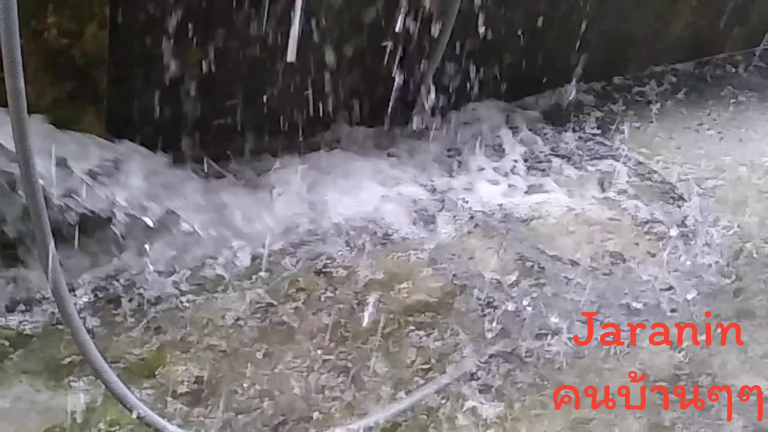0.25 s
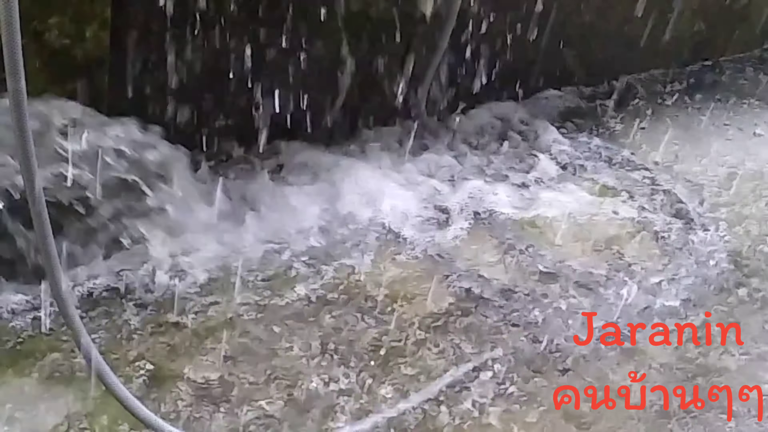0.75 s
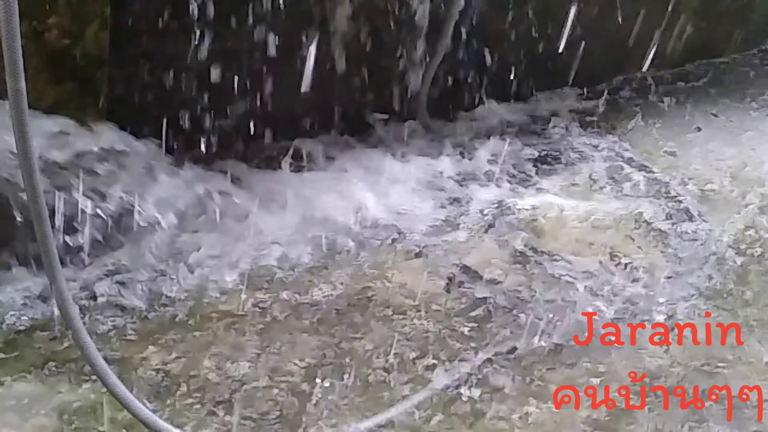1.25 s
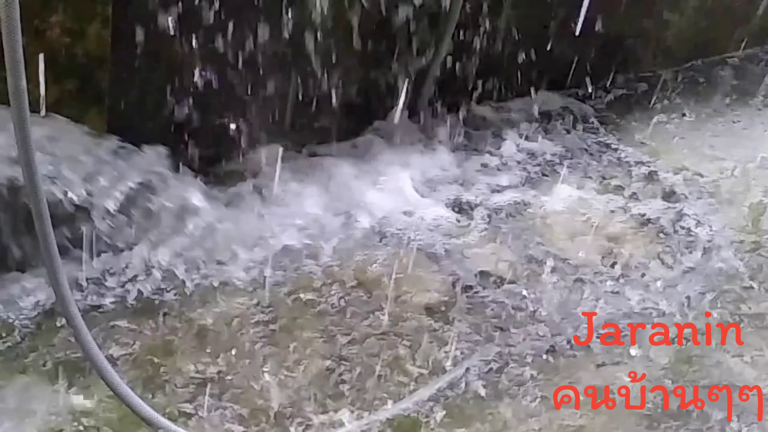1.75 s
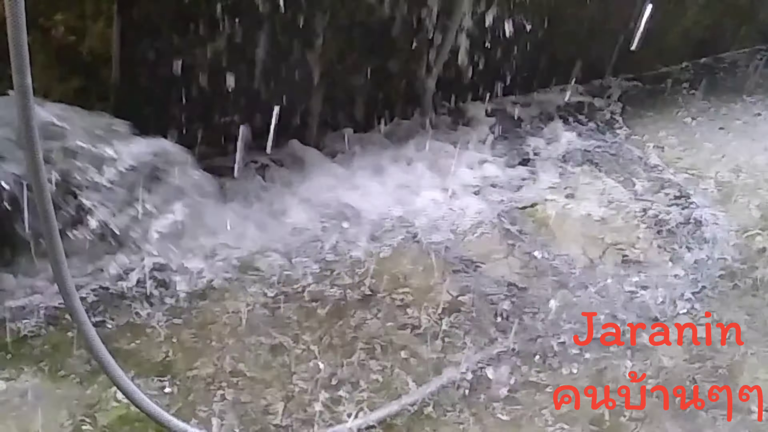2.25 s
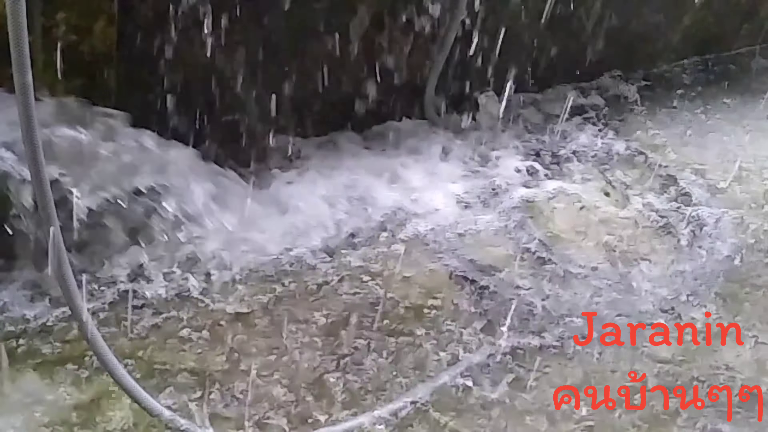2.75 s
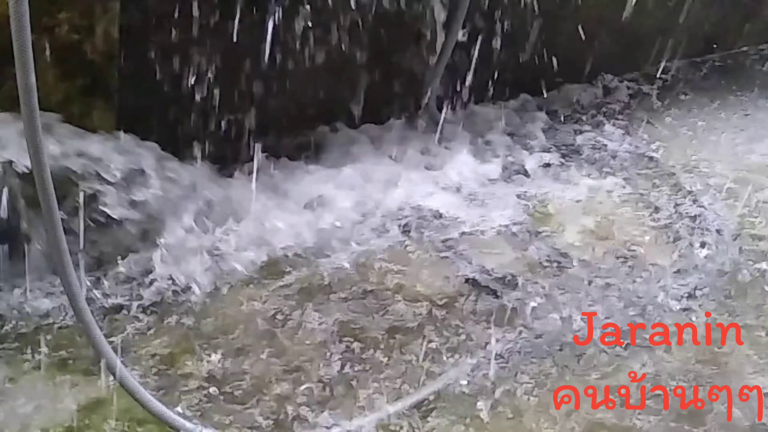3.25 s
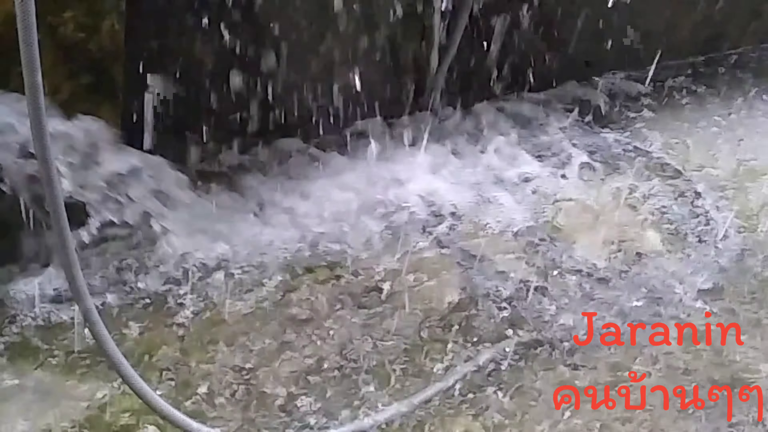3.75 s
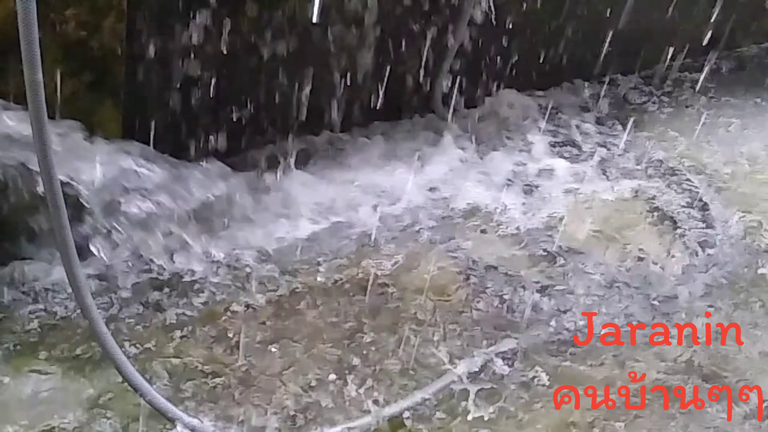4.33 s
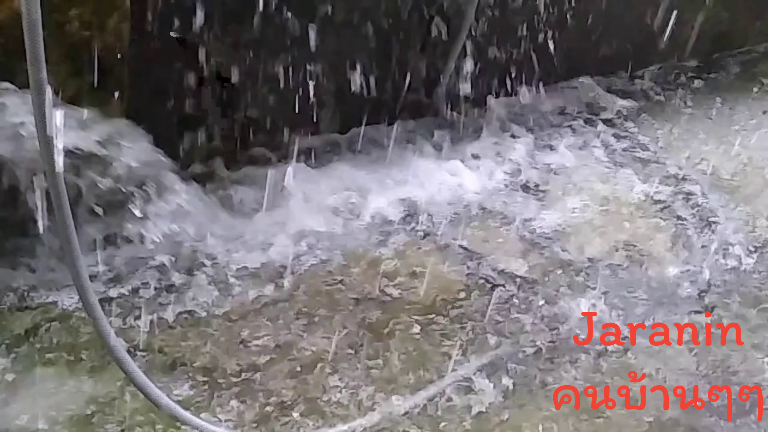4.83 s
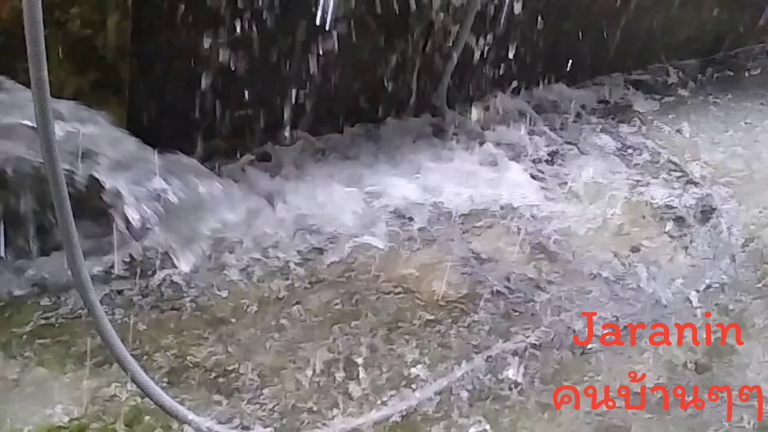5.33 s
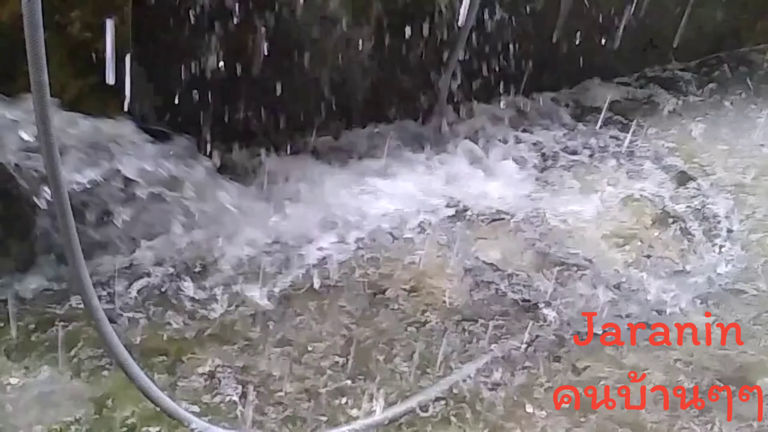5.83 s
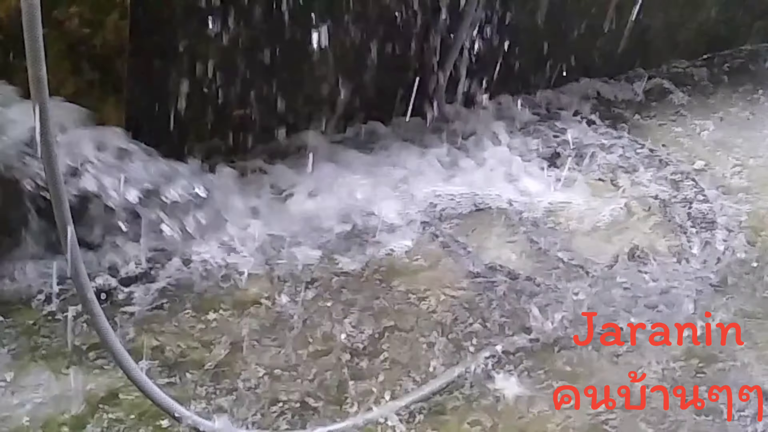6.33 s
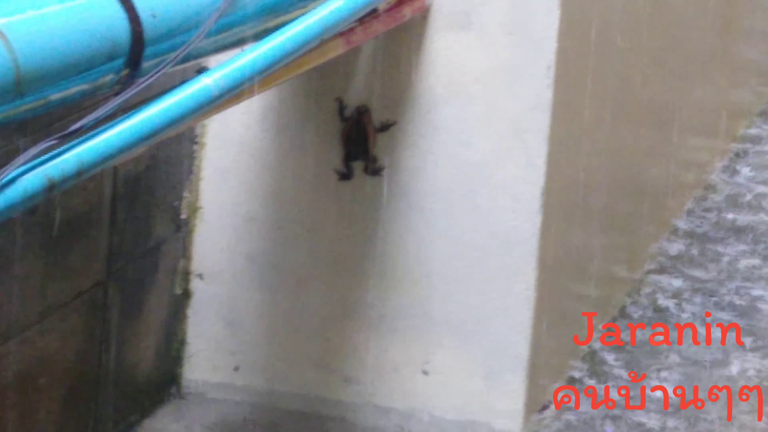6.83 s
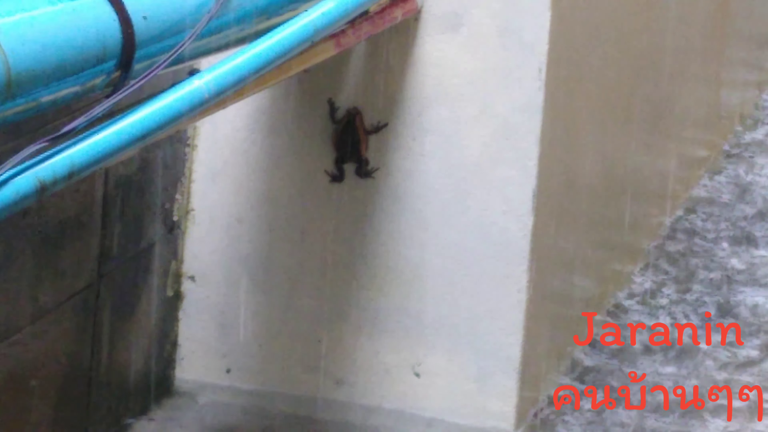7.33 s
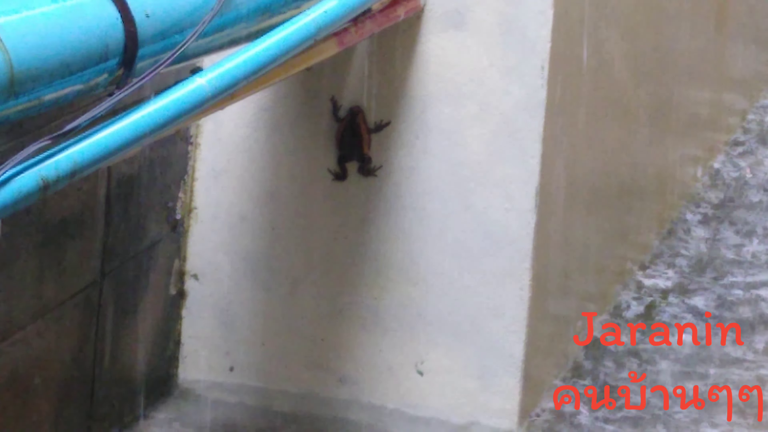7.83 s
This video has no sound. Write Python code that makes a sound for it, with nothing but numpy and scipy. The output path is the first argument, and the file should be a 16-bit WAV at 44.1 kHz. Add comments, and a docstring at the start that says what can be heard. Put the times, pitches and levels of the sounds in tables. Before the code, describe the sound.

A loud, dense downpour fills a concrete yard, with a drain gushing steadily underneath and sharp wet drops striking close by. The sound is dull on top, as if through a narrow microphone channel. After about six and a half seconds it cuts to a very short silence, then quieter, brighter rain quickly fades in beside a sheltered wall, fizzing more on the left.

```python
"""A downpour heard from two places, joined by a short silence: countless splashes merge into a hiss.
First a yard where a drain gushes over concrete, through a narrow channel that ends near 5 kHz; then,
fading in, a sheltered wall at wider bandwidth. Far rain is patchy filtered noise, near drops are ragged
decaying bursts, the drain and runoff are the bass of the water, and each microphone port has its own colour."""
import sys
import numpy as np
from scipy import signal
from scipy.fft import rfft, irfft, next_fast_len
from scipy.io import wavfile
from scipy.ndimage import uniform_filter1d, map_coordinates

SR = 44100
rng = np.random.default_rng(int(sys.argv[2]) if len(sys.argv) > 2 else 0)


def store_wav(level_fs):
    """Save 16-bit WAV to argv[1]."""
    pcm = np.round(np.clip(np.atleast_2d(level_fs), -1, 1) * 32767)
    wavfile.write(sys.argv[1], SR, pcm.T.astype(np.int16))


N = 356328
YARD_END, WALL_START = 6.4405, 6.562  # s

# The loudest near drops in both places. Each row: moment in seconds, left level in dB,
# right level in dB, pitch in Hz; levels are those before the drops are dulled.
DROPS = [(0.6388, 2, 3, 3780), (1.1824, -10, -1, 3285), (1.6257, -7, -3.5, 3350), (1.8636, -14, -2, 3440),
         (2.0316, -2.5, -8.5, 3300), (2.1945, -4.5, -9, 3690), (2.3055, -7.5, -3, 3400),
         (2.506, -0.5, -4, 3470), (3.083, -7, -1, 3310), (4.196, -6.5, -9, 3310),
         (4.4304, -5.5, -2.5, 3120), (4.6288, -9, -1, 3610), (4.669, -4, 2, 3330), (4.6769, -9, 0.1, 3020),
         (5.0752, -8, 0.1, 3530), (5.38, -9.5, -4, 2900), (5.8908, -6, -0.5, 2910), (6.7912, -19, -7, 3320),
         (6.8214, -17, -5, 3400), (7.156, -16, -12, 2700), (7.2696, -15, -4, 3500), (7.493, -21, -8, 3001)]


def amp(db):
    """The decibel: 20 dB is a factor of ten in amplitude."""
    return 10 ** (np.asarray(db) / 20)


def unit(x):
    """Normalisation to a root-mean-square of one."""
    return x / np.sqrt(np.mean(x ** 2) + 1e-20)


def along(points, hz):
    """Interpolation on a logarithmic frequency axis of the columns of (Hz, value, ..) points."""
    f, *columns = np.transpose(points)
    return np.array([np.interp(np.log(hz + 1), np.log(f + 1), column) for column in columns])


def wobble(rate):
    """Slow random modulation: a smooth curve through random knots, rate knots a second."""
    knots = rng.standard_normal(int(N * rate / SR) + 4)
    return map_coordinates(knots, [np.arange(N) * rate / SR])


def filtered(x, response):
    """Linear filtering: the spectrum of x times a response of frequency."""
    m = next_fast_len(N + 8192)
    return irfft(rfft(x, m) * response(np.fft.rfftfreq(m, 1 / SR)), m)[..., :N]


def below(x, hz):
    """Zero-phase low-pass filtering: the part of x under hz."""
    return filtered(x, lambda f: 1 / (1 + (f / hz) ** 4))


def hiss(alike, patchy_db, fizz_db):
    """Far rain as stereo noise with local gain fluctuations and a correlation that depends on frequency."""
    white = signal.stft(rng.standard_normal((2, N)), nperseg=512)[2]
    shape = white.shape[1:]  # frequency bins, time frames
    patches = uniform_filter1d(rng.standard_normal(shape), size=8, axis=0)
    patches = uniform_filter1d(patches, size=10, axis=1)
    fizz = uniform_filter1d(rng.standard_normal(shape), size=7, axis=1)  # brief, one bin wide
    gain_db = patchy_db * unit(patches) + fizz_db * unit(fizz)
    pair = signal.istft(white * amp(gain_db), nperseg=512)[1][:, :N]

    def mid_side_gains(hz):
        # the cosine of twice this angle is the left-right correlation
        angle = np.arccos(np.clip(along(alike, hz)[0], -1, 1)) / 2
        return np.array([np.cos(angle), np.sin(angle)])

    mid, side = filtered(pair, mid_side_gains)
    return unit(np.array([mid + side, mid - side]))


def splats(s, gains, hz, cycles, size=200):
    """Transient oscillation: each drop is a ragged burst, its envelope peaking at s, in random phase per port."""
    t = np.arange(size) / SR
    rise = cycles / hz
    u = t / rise[:, None]
    envelope = (np.e * u * np.exp(-u))[:, None]
    phase = rng.uniform(0, 2 * np.pi, (len(s), 2, 1))
    ragged = 1 + .5 * rng.standard_normal((len(s), 2, size))
    wave = envelope * np.sin(2 * np.pi * hz[:, None, None] * t + phase) * ragged
    first = (np.clip(s - rise, 0, None) * SR).astype(int)
    at = first[:, None] + np.arange(size)
    ports = []
    for c in (0, 1):
        weighted = wave[:, c] * gains[:, c, None]
        ports.append(np.bincount(at.ravel(), weighted.ravel(), N + size)[:N])
    return np.array(ports)


def patter(span, low_hz, high_hz, spread_db, cycles, count):
    """Near rain as a random superposition of splashes, a few much larger than most; rms 1 while it lasts."""
    draw = rng.uniform(size=(count, 3))
    s = span[0] + (span[1] - span[0]) * draw[:, 0]
    hz = low_hz + (high_hz - low_hz) * draw[:, 1]
    size_db = np.minimum(-spread_db * np.log(draw[:, [2]]), 11)
    size_db = size_db + 1.9 * rng.standard_normal((count, 2))  # differs between the ports
    splashes = splats(s, amp(size_db), hz, cycles)
    bright = splashes - below(splashes, low_hz)
    return unit(bright) * np.sqrt((span[1] - span[0]) * SR / N)


def stray_drops(count):
    """Random arrivals: rows like those of DROPS, at chance moments in the yard with scattered level and pitch."""
    s, draw = rng.uniform(0, YARD_END, count), rng.standard_normal((count, 3))
    levels_db = np.add((-11, -4.5), 2.5 * draw[:, :2])  # mean left and right
    hz = 3500 + 350 * draw[:, 2]
    return list(np.column_stack([s, levels_db, hz]))


def big_drops(table, cycles, top_hz):
    """Impact and fallback: large drops with a level at each port, their edge dulled by wet ground."""
    s, left_db, right_db, hz = np.transpose(table)
    gains = amp(np.transpose([left_db, right_db]))
    drops = splats(s, gains, hz, cycles)
    for late_s, late_db in [(.0016, -1.5), (.0038, -5.5)]:  # the splash falls back as smaller droplets
        late = s + late_s * rng.uniform(.7, 1.3, len(s))
        drops += splats(late, gains * amp(late_db), hz * rng.uniform(.8, 1.25, len(s)), cycles)
    return below(drops, top_hz)


def ticks():
    """Filtered impulses: faint crackles at listed moments, reaching above the yard's band, duller when softer."""
    # Faint treble ticks. Each row: moment in seconds, level in dB before the burst is coloured.
    tick_rows = [(0.3222, -35), (0.4663, -29), (0.6245, -19), (0.6388, -6.5), (1.6257, -38), (1.9435, -39),
                 (2.3047, -37), (2.506, -11.5), (2.5775, -34), (3.3253, -31), (4.189, -35), (4.3105, -32),
                 (4.4292, -12.5), (5.0731, -27)]
    top_hz, slope, dull_db = 5960, 3.2, 7  # the fall is one order steeper for each dull_db of level lost
    out, n = np.zeros((2, N)), np.arange(1024)
    distance = np.abs(n - 300)  # samples from the peak
    # a sharp peak with a faint noise tail on both sides
    decay = amp(-.25 * distance) + amp(-19.0 - 0.028 * distance)
    hz = np.fft.rfftfreq(len(n), 1 / SR)
    for s, db in tick_rows:
        burst = rfft(decay * np.hanning(len(n)) * rng.standard_normal((2, len(n))))
        colour = np.clip(hz / 500 - 9, 0, 1) / (1 + (hz / top_hz) ** (slope - db / dull_db))
        out[:, round(s * SR) - 300:][:, :len(n)] += amp(db) * irfft(burst * colour)
    return out


def snap():
    """Exponential decay of a noise burst: one drop right at the left port, softened above 9 kHz."""
    # One row: start in seconds, left level in dB, right level in dB, both before softening.
    snap_row = (6.692, -2, -21)
    at, out = round(snap_row[0] * SR), np.zeros((2, N))
    level_db = np.array(snap_row[1:])[:, None] - np.arange(60) * 1.1  # 1.1 dB down a sample
    out[:, at:at + 60] = amp(level_db) * rng.standard_normal(60)
    return below(out, 9000)


def runoff(bass):
    """Amplitude modulation: the bass of the wall's water wavers as runoff."""
    return amp(-37 + 2.1 * wobble(6)) * unit(bass)


def wall():
    """Directional colouring: the left port faces the spray and fizzes, the right is shaded and rings near 3 kHz."""
    # Port colour. Each row: frequency in Hz, left gain in dB, right gain in dB.
    wall_ports = [(30.5, -15, -10), (156, -4.5, -5), (453, -11.5, -7.5), (800, -9, -4), (1290, -7, -6.5),
                  (1750, -11.5, -7.5), (2290, -11, -1.5), (3360, -11.5, 1.5), (4450, -11.5, -10.5),
                  (5930, -12.5, -11), (7600, -15, -25), (10160, -8, -31), (11800, -2.5, -29),
                  (14500, -5, -33)]
    # Left-right likeness of far rain. Each row: frequency in Hz, correlation from -1 to 1.
    wall_alike = [(60, 0.99), (200, .98), (340, .92), (640, 0.69), (900, 0.051), (1400, 0), (4000, 0.012)]
    rain_db, spray_db = -23, -24.5  # mean levels once faded in, before the swell
    fade_s, fade_from_db = .2, -15.5  # rises evenly in dB
    swell_s, swell_lasts_s, swell_db = 7.5, 0.11, 2.5  # centre, half width at 1/e, rise of the rain
    t = np.arange(N) / SR
    fade_db = fade_from_db * np.clip(1 - (t - WALL_START) / fade_s, 0, 1)
    swell = swell_db * np.exp(-((t - swell_s) / swell_lasts_s) ** 2)

    far = hiss(wall_alike, patchy_db=0.9, fizz_db=3.0)
    near = patter((6.55, 8.07), 1300, 17000, spread_db=1.0, cycles=.9, count=6000)
    spit = patter((6.55, 8.07), 8000, 15500, spread_db=4.2, cycles=3.5, count=900)  # fine droplets ping high
    mixed = far + amp(-8.0) * near + amp(-8.5) * spit
    water = filtered(mixed, lambda hz: amp(along(wall_ports, hz)) * hz / np.hypot(hz, 25))

    bass, dull = below(water, 380), below(water, 6200)
    sound = amp(rain_db + swell + 0.19 * wobble(5.6) + 0.27 * wobble(17)) * unit(dull - bass)
    sound += amp(spray_db + 0.56 * wobble(12)) * unit(water - dull)
    sound += runoff(bass)
    drops = big_drops([d for d in DROPS if d[0] > WALL_START], cycles=1.46, top_hz=4840)
    return amp(fade_db) * sound + snap() + drops


def drain(bass):
    """Independent modulation: the gushing drain owns the yard's bass and surges on its own."""
    return amp(-26.5 + 0.25 * wobble(2.5) + 0.32 * wobble(7)) * unit(bass)


def narrow_channel(sound):
    """Saturation, then band limiting: the microphone rounds off the loudest drops and the treble ends steeply."""
    top_hz = 4927  # about 9 dB down here
    squeezed = sound / (1 + np.abs(sound / .85) ** 4) ** (1 / 4)

    def response(hz):
        loss_db = np.clip((hz - top_hz + 180) / 60, 0, 9) ** 2 * 1.01
        return amp(-loss_db) * hz / np.hypot(hz, 15)

    return filtered(squeezed, response)


def yard():
    """Superposition: far hiss, near patter, large drops and the drain add up before the narrow channel."""
    # Port colour. Each row: frequency in Hz, left gain in dB, right gain in dB.
    yard_ports = [(25, 3, -0.5), (60, 3, 4.5), (89, -2, -0.5), (280, 1.5, 2), (400, 2, 4), (710, -3, -0.5),
                  (965, -1.5, 1.5), (1310, -6, -1), (1490, -3, -2.5), (1880, -9, -7.5), (2603, -4.5, 3),
                  (3320, 0, 5), (4200, -4.5, -1), (4700, -2.5, -3)]
    # Left-right likeness of far rain. Each row: frequency in Hz, correlation from -1 to 1.
    yard_alike = [(40, 1), (130, 0.85), (260, 0.44), (340, -0.15), (430, -0.5), (560, 0.37), (900, -0.035)]
    rain_db = -14  # mean level before the channel
    near = patter((0, 6.45), 1400, 5500, spread_db=3.0, cycles=1.2, count=9000)
    mixed = hiss(yard_alike, patchy_db=0.83, fizz_db=2.0) + amp(-10.0) * near
    water = filtered(mixed, lambda hz: amp(along(yard_ports, hz)))

    bass = below(water, 450)
    waver_db = 0.5 * wobble(1.9) + 0.46 * wobble(9) + 0.39 * wobble(25)
    sound = amp(rain_db + waver_db) * unit(water - bass) + drain(bass)
    drops = [d for d in DROPS if d[0] < YARD_END] + stray_drops(count=20)
    sound += big_drops(drops, cycles=0.76, top_hz=6100)
    return narrow_channel(sound)


def scene():
    """Time gating: the yard stops dead and the wall starts after the gap."""
    t = np.arange(N) / SR
    return (yard() + ticks()) * (t < YARD_END) + wall() * (t > WALL_START)


def record(dry):
    """Band limiting: a squared-sine slope 140 Hz wide, with nothing passed above 15830 Hz."""
    return filtered(dry, lambda hz: np.sin(np.clip((15830 - hz) / 140, 0, 1) * np.pi / 2) ** 2)


dry = scene()
out = record(dry)
store_wav(out)
```